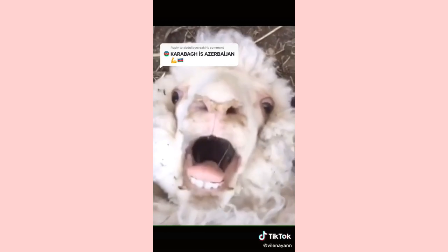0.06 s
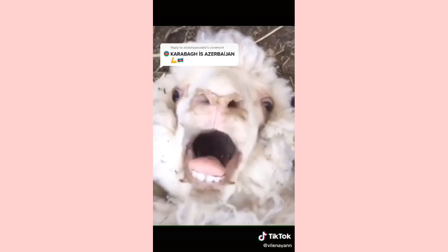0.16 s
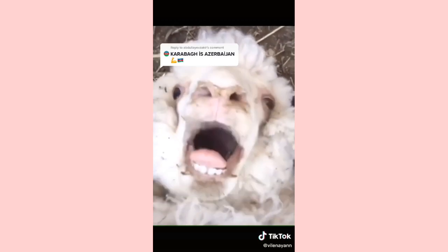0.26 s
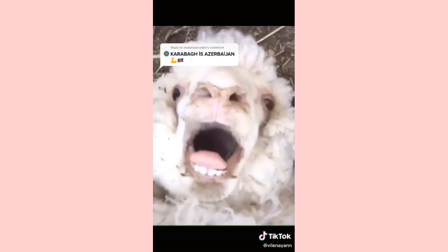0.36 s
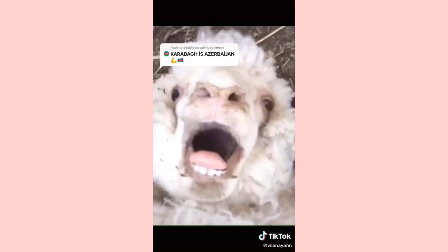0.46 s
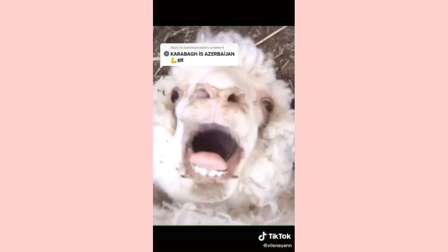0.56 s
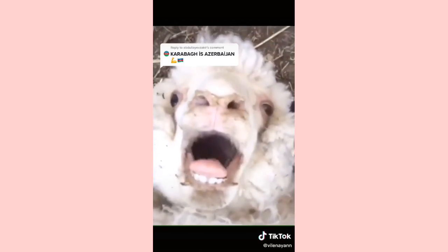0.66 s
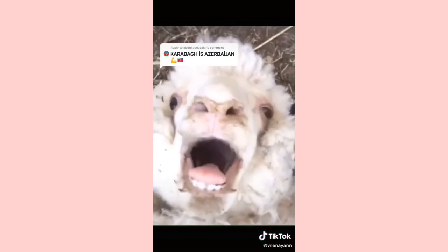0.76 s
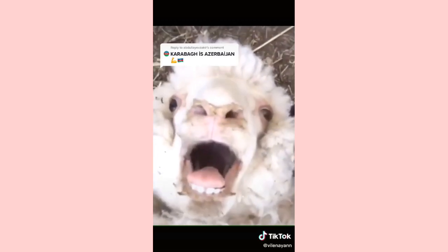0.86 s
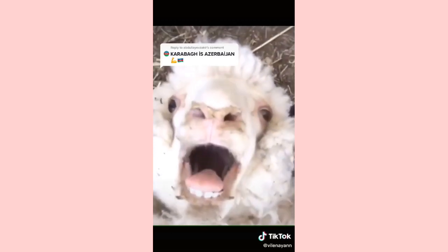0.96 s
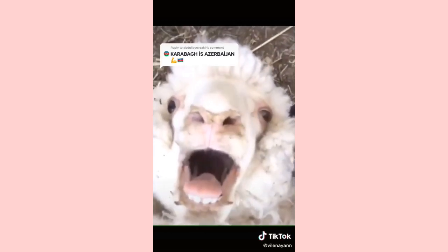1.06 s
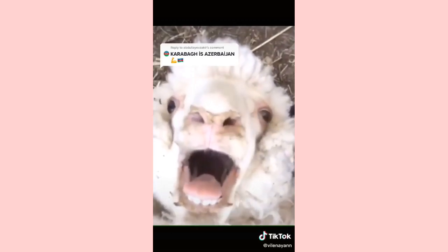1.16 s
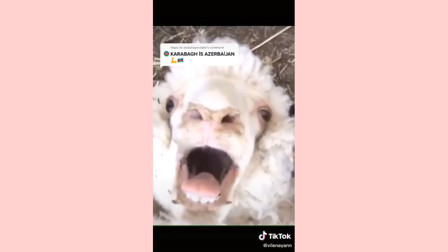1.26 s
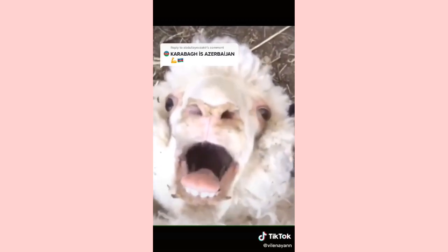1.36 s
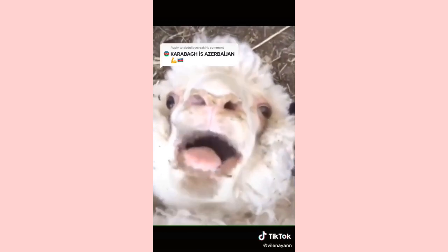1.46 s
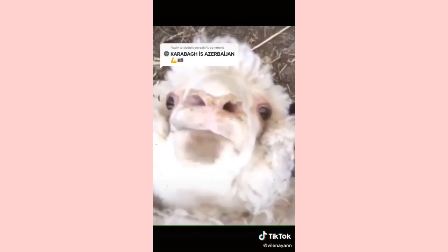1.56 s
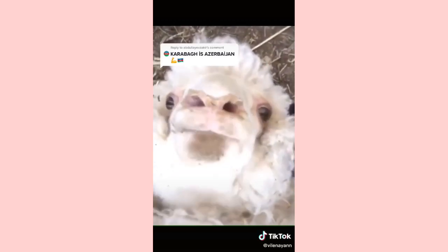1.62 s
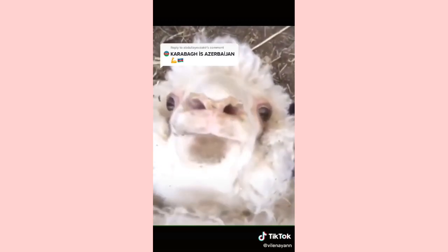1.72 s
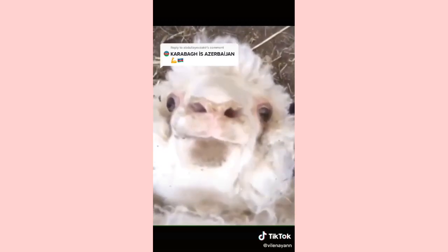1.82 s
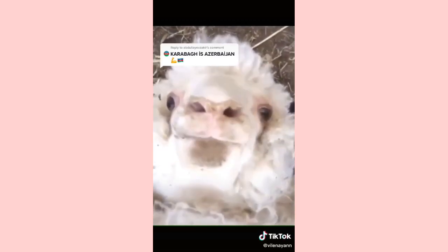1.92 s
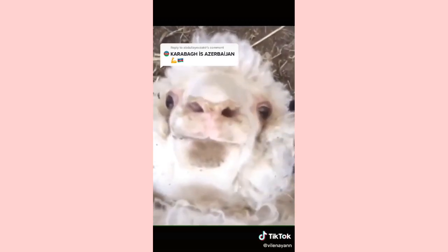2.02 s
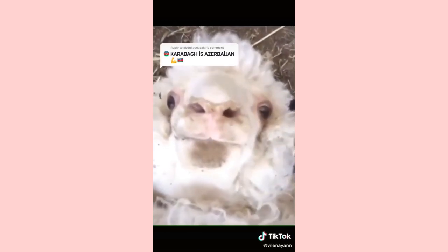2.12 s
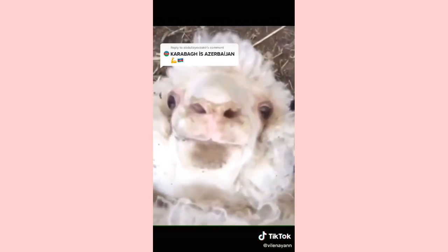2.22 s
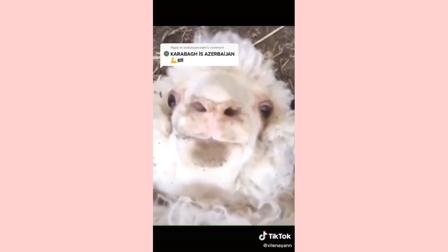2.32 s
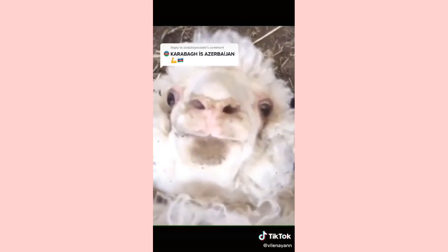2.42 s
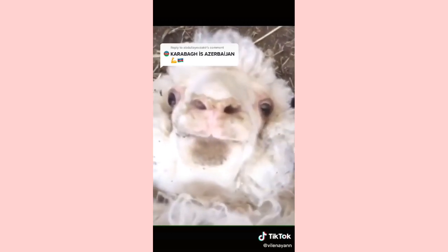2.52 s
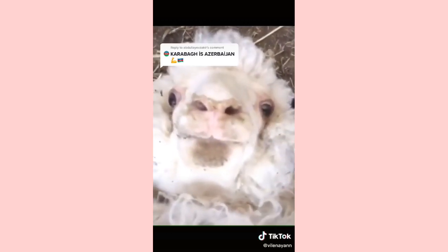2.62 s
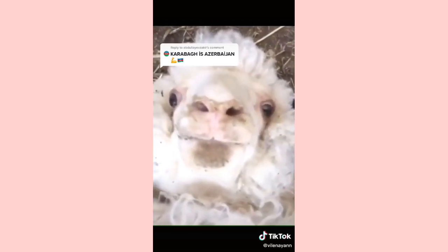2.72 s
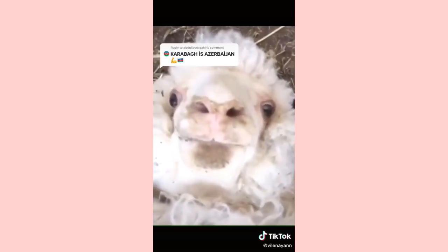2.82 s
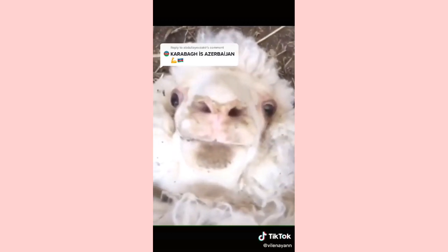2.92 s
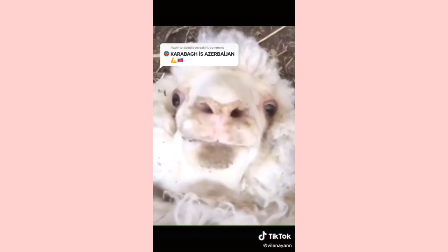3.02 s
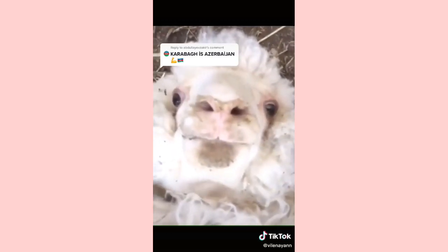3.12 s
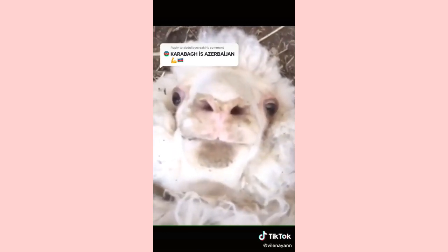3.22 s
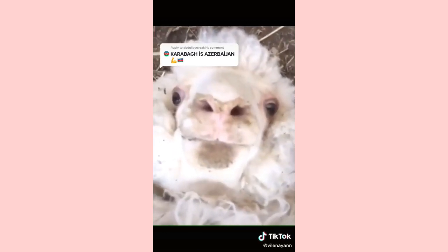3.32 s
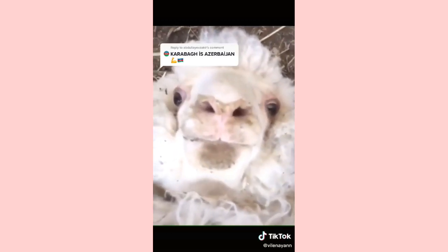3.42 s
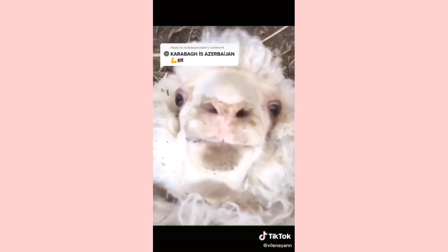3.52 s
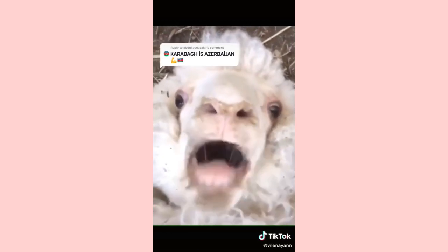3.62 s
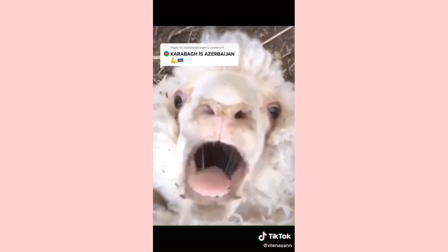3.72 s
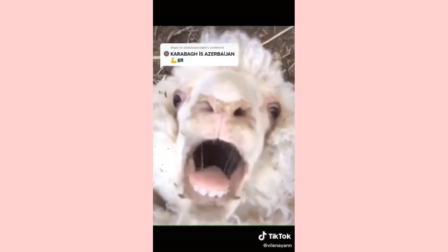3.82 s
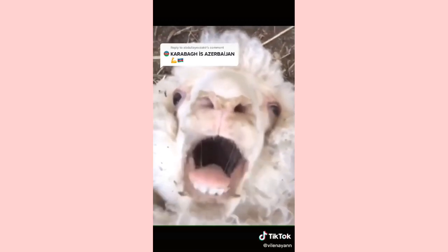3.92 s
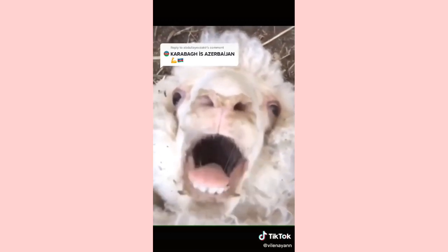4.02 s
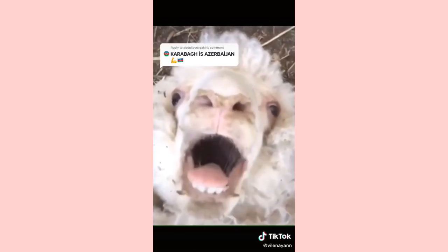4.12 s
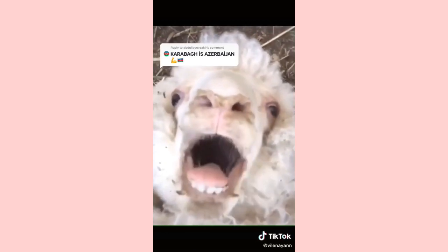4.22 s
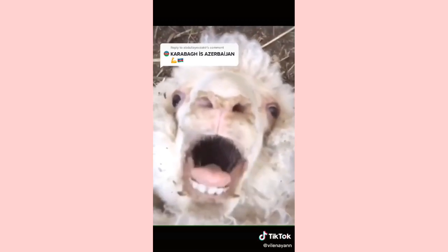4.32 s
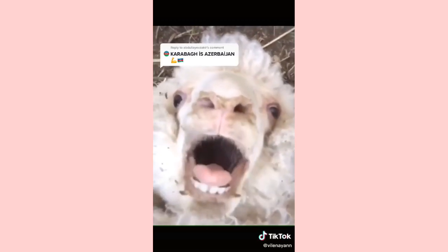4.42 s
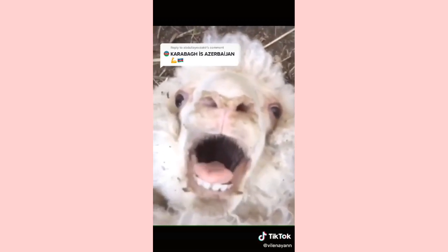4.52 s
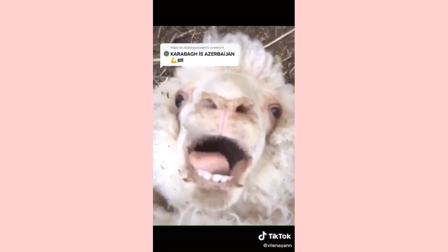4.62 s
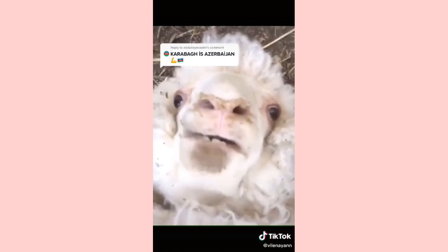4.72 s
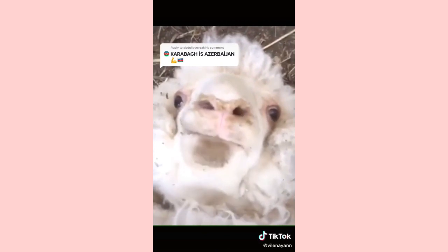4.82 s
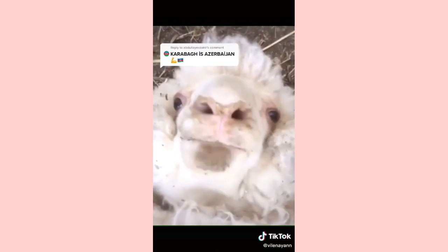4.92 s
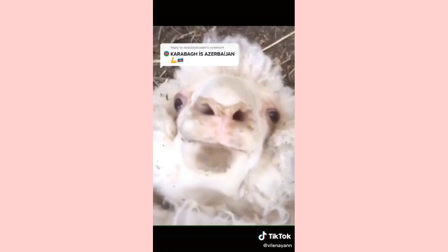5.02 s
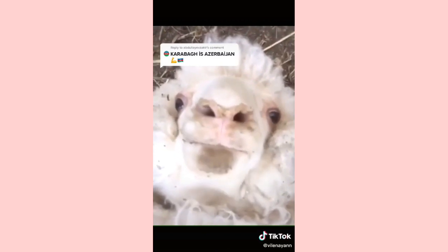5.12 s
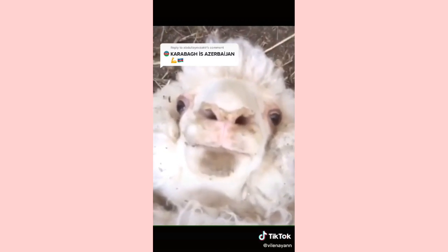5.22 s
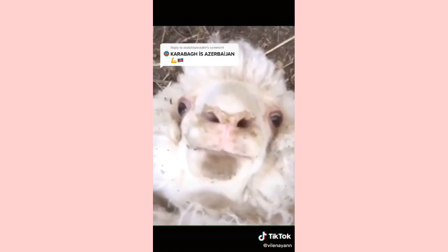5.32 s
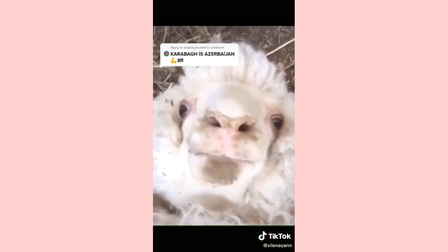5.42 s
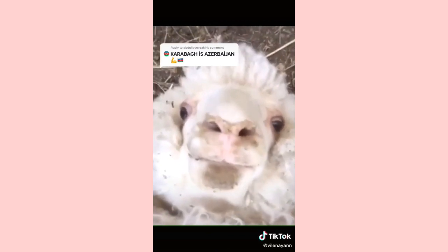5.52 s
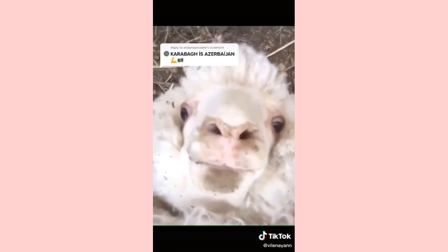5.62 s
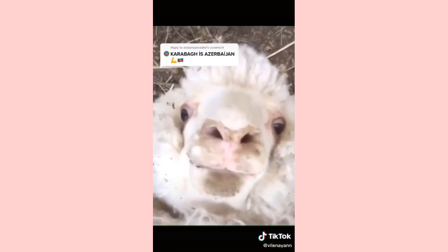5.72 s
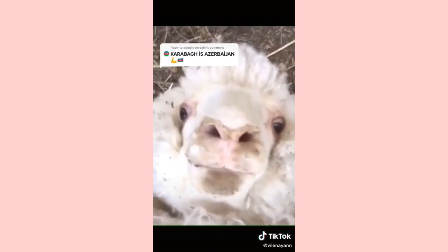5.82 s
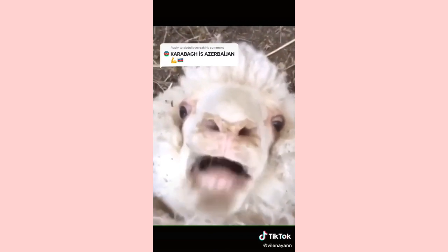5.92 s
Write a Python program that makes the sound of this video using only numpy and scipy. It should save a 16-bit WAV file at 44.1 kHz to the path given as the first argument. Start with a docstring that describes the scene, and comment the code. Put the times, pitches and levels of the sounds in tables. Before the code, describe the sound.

Two long, loud baas from a close sheep in a quiet outdoor pen, with faint sniffing and a third bleat just beginning.

```python
"""A quiet, almost dry outdoor pen, a sheep bleating wide-mouthed up close: two long baas, then the start
of a third. The first opens rough; the others begin as a rasp of irregular flaps of the vocal folds.
Once the folds lock, their pulses buzz through the resonances of throat and mouth as a steady note.
In between, the sheep shuts its mouth, snorts, sniffs and smacks faintly."""
import sys
import numpy as np
from scipy import signal
from scipy.fft import rfft, irfft
from scipy.io import wavfile
from scipy.ndimage import uniform_filter1d

SR = 44100
rng = np.random.default_rng(int(sys.argv[2]) if len(sys.argv) > 2 else 0)


def wrap_up_sound(samples):
    """Save the sound to the file named by the first command line argument, as 16-bit audio."""
    columns = np.atleast_2d(samples).T
    # keep every value between -1 and 1, then stretch to whole-number steps
    tamed = np.clip(columns, -1, 1)
    steps = np.round(tamed * 32767).astype(np.int16)
    wavfile.write(sys.argv[1], SR, steps)


N = 262836
TIME = np.arange(N) / SR


def from_db(db):
    """Decibels to gain."""
    return 10 ** (np.asarray(db) / 20)


def rms_one(x):
    """Scale to rms 1."""
    return x / np.sqrt(np.mean(x ** 2) + 1e-20)


def even(x, window_s=.04):
    """Hold the running rms at 1."""
    return x / np.sqrt(np.abs(uniform_filter1d(x * x, int(window_s * SR))) + 1e-14)


def curve(points):
    """Join (time, value) breakpoints, one value a sample."""
    return np.interp(TIME, *np.transpose(points))


def gate(start, end):
    """1 from start to end, with soft edges."""
    return uniform_filter1d(1. * ((TIME >= start) & (TIME <= end)), size=300)


def bell(offset_s, width_s):
    """1 at no offset, falling away smoothly to both sides."""
    return np.exp(-(offset_s / width_s) ** 2)


def cut(x, hz, kind, order):
    """Butterworth filter."""
    return signal.sosfilt(signal.butter(order, hz, kind, fs=SR, output="sos"), x + 1e-18)


def sliding_resonance(x, hz, width_hz):
    """A resonance of gain 1 whose centre follows hz."""
    turn, radius = np.exp(2j * np.pi * np.cumsum(hz) / SR), np.exp(-np.pi * width_hz / SR)
    return 2 * np.real(turn * signal.lfilter([1 - radius], [1, -radius], x / turn))


def coloured_noise(spectrum):
    """Noise of rms 1 with the given spectral shape."""
    hz, db = np.transpose(spectrum)
    bins = np.maximum(np.fft.rfftfreq(N, 1 / SR), 1)
    gain = from_db(np.interp(np.log(bins), np.log(hz), db))
    return rms_one(irfft(rfft(rng.standard_normal(N)) * gain, N))


def pulses(times, sizes):
    """A click at each time, shared between its two nearest samples."""
    at, out = np.clip(np.asarray(times) * SR, 0, N - 2), np.zeros(N)
    np.add.at(out, at.astype(int), sizes * (1 - at % 1))
    np.add.at(out, at.astype(int) + 1, sizes * (at % 1))
    return out


def outdoor_bed():
    """Steady open-air ambience: a low rumble under a thin hiss."""
    # spectral shape of the ambience: f/Hz, level/dB
    spectrum = [(15, -35.5), (28, -16), (48, -1), (110, -5), (190, -10), (320, -16.5), (700, -19),
                (1500, -17.5), (2400, -26.5), (3000, -16), (3700, -30), (6000, -31.5), (10000, -41.5),
                (13000, -40), (15500, -38.5)]
    return coloured_noise(spectrum)


def pen_echo(x, t60=0.28, dull_hz=4500, first_echo_s=0.004):
    """A short, dull tail scattered from the ground and things around."""
    age = TIME[:SR]
    tail = cut(rng.standard_normal(SR), dull_hz, "low", order=1)
    tail *= from_db(-60 * age / t60) * (age > first_echo_s)
    return signal.fftconvolve(x, tail / np.linalg.norm(tail))[:N]


def smacks():
    """Soft smacks and gulps: each is a small noise burst ringing one cavity of the shut mouth."""
    # bursts, ahead of the low-pass: t/s, peak/dB, f/Hz, width/Hz, length/s
    bursts = [(1.946, -50, 1260, 120, .02), (2.627, -54, 866, 120, 0.019), (3.025, -54, 3053, 702, 0.017),
              (3.295, -48, 1900, 1100, 0.0067), (3.297, -51.5, 570, 200, .015),
              (3.376, -55, 408, 60.6, 0.017), (3.468, -49.5, 1810, 990, 0.006),
              (4.824, -58, 201.5, 158, 0.01035), (5.446, -48, 2270, 700, 0.026)]
    out = np.zeros(N)
    for start, peak_db, hz, width, length in bursts:
        age = np.maximum(TIME - start, 0) / length
        burst = age * np.exp(-2 * age) * rng.standard_normal(N) + 1e-18
        radius = np.exp(-np.pi * width / SR)
        cavity = [1, -2 * radius * np.cos(2 * np.pi * hz / SR), radius ** 2]
        ring = signal.lfilter([1, 0, -1], cavity, burst)
        out += from_db(peak_db) * ring / np.abs(ring).max()
    return cut(out, 4500, "low", order=4)


def draughts(rows, attack_s=.016, fade_db_per_s=327):
    """Envelope of a run of breaths: each swells, holds and dies away."""
    power = 0
    for start, length, db in rows:
        swell = np.clip((TIME - start) / attack_s, 0, 1)
        fade_db = fade_db_per_s * np.clip(TIME - start - length, 0, 1)
        power += (swell * from_db(db - fade_db)) ** 2
    return np.sqrt(power)


def airway(x, resonances, low_hz=130, soft_hz=6300, top_hz=10800):
    """Softened sound passes each resonance in turn, then lingers in the side cavities of the head."""
    # side cavities: f/Hz, width/Hz
    cavities = [(1000, 600), (1850, 850), (2200, 1300), (2550, 350)]
    x = cut(x, low_hz, "high", order=1)
    x = cut(x, soft_hz, "low", order=4)
    x = cut(x, top_hz, "low", order=6)
    for hz, width, db in resonances:
        pole, turn = np.pi * width / SR, -2 * np.cos(2 * np.pi * hz / SR)
        zero = pole * from_db(db)
        x = signal.lfilter([1 + zero, turn, 1 - zero], [1 + pole, turn, 1 - pole], x)
    for hz, width in cavities:
        pole, turn = np.pi * width / SR, -2 * np.cos(2 * np.pi * hz / SR)
        x = signal.lfilter([1 - pole, turn, 1 + pole], [1 + pole, turn, 1 - pole], x)  # all-pass smear
    return x


def nostrils(snort_db=-0.7, sniff_db=-0.3):
    """One snort rings the nose after the first baa; small uneven sniffs follow both baas."""
    # resonances of the nose: f/Hz, width/Hz, gain/dB
    nose = [(1250, 120, 25), (2230, 280, 10.5), (3150, 140, 16), (3900, 80, 6), (5000, 330, 8.5)]
    # pushes of the snort: t/s, length/s, level/dB
    pushes = [(1.728, 0.066, -54), (1.83, .095, -60), (1.93, .04, -56.5), (2.03, .13, -63)]
    # sniffs: t/s, length/s, level/dB
    sniffs = [(2.365, .05, -69), (2.84, .17, -64.5), (3.015, 0.025, -56.5), (3.185, 0.064, -57),
              (3.355, .025, -66), (4.975, .17, -69.5), (5.145, .03, -59), (5.247, .035, -59),
              (5.342, 0.029, -60.5), (5.44, .035, -57.5), (5.55, .35, -65.5)]
    # spectral shape of the sniffs: f/Hz, level/dB
    sniff_colour = [(300, -33), (600, -6), (1030, -22), (1300, -4), (1820, 2.5), (2100, -8), (2280, -1.5),
                    (2490, -11.5), (2950, 7.5), (3700, -20), (4200, -8.5), (5600, -19.5), (7800, -31.5),
                    (11000, -49)]
    nasal = rms_one(airway(rng.standard_normal(N), nose, low_hz=1400, soft_hz=5470))
    snort = from_db(snort_db) * draughts(pushes) * nasal
    return snort + from_db(sniff_db) * draughts(sniffs) * coloured_noise(sniff_colour)


def puffs(closures, length_s):
    """Each closure of the folds lets out a short puff of turbulence, as strong as the closure itself."""
    fade = np.exp(-1 / (length_s * SR))
    flow = signal.lfilter([np.sqrt(1 - fade ** 2)], [1, -fade], closures + 1e-18)
    return flow * rng.standard_normal(N)


def scatter(x, t60=.02, from_hz=4700, amount_db=-0.5):
    """The short waves of the treble bounce about between teeth and palate."""
    age = TIME[:2000]
    bounces = rng.standard_normal(len(age)) * from_db(-60 * age / t60)
    treble = cut(x, from_hz, "high", order=4)
    return x + from_db(amount_db) * signal.fftconvolve(treble, bounces / np.linalg.norm(bounces))[:N]


def mouth(voice, level_db, first_db, upper_db, edge_db, sheen_db=-15.5, sheen_slope=2.1):
    """Jaw and tongue weight the bands against the second formant; a hard push brings out the sheen."""
    out = 0
    for top_hz, weight_db in [(1500, first_db), (2150, 0), (3700, upper_db), (6900, edge_db)]:
        band = signal.sosfiltfilt(signal.butter(10, top_hz, fs=SR, output="sos"), voice)
        out += even(band) * from_db(weight_db)
        voice = voice - band
    push_db = np.clip(level_db + 20, -1.5, 4)
    sheen = even(voice) * from_db(edge_db + sheen_db + sheen_slope * push_db)
    return (out + sheen) * from_db(level_db)


def opening_mouth(voice, start, end, first_db, speed):
    """The mouth opens on a rasp: the formants swell while the treble edge sinks and recedes."""
    # sinking resonance: start f/Hz, wide-open f/Hz, time constant/s, width/Hz, gain/dB
    sinking = (7000, 4000, .085, 410, 8)
    # second, first, upper formants and treble edge: start level/dB, wide-open level/dB, time constant/s
    opening = [(-36.5, -18, .055), (-43, -25.5, 0.018), (-33, -18, .028), (-31, -40, .16)]
    age = speed * np.maximum(TIME - start, 0)
    shut_hz, wide_hz, sink_s, width_hz, ring_db = sinking
    ring_hz = wide_hz + (shut_hz - wide_hz) * np.exp(-age / sink_s)
    voice = voice + from_db(ring_db) * sliding_resonance(voice, ring_hz, width_hz)
    second, first, upper, edge = [wide + (shut - wide) * np.exp(-age / pace_s)
                                  for shut, wide, pace_s in opening]
    voice = mouth(voice, second, first + first_db - second, upper - second, edge - second)
    return voice * gate(start, end)


def rasp(flap_hz=180, jitter_s=.0009, shimmer_db=-0.5, air_db=-6, rattle_db=-3.0):
    """Before they lock, the folds flap unevenly in a strong flow; a few flaps stand out."""
    # peaks and dips of the rasping throat: f/Hz, width/Hz, gain/dB
    throat = [(932, 210, 28.5), (1760, 320, 16), (2230, 180, 13.5), (2708, 73, 8.5), (2978, 270, 21.5),
              (3800, 310, -10), (4800, 1600, 13), (7200, 510, -3.5), (7740, 230, 16.5)]
    # rasping onsets: start/s, end/s, first-formant trim/dB, jaw speed/multiple of the usual
    onsets = [(3.608, 3.621, 0, 2.5), (3.626, 3.897, 0, 1), (5.938, 5.98, -9, 6)]
    # hardest flaps of the folds: t/s, level/dB
    hard_flaps = [(3.594, -42), (3.6134, -11.5), (3.6275, -16), (3.6555, -9.5), (3.67, -8), (3.694, -8),
                  (3.707, -11), (3.732, -3.5), (3.7724, -8.5), (3.788, -6), (3.8452, -8.5), (5.919, -28),
                  (5.939, -16), (5.953, -7.5)]
    late, strong = rng.standard_normal((1400, 2)).T
    closures = pulses(np.arange(len(late)) / flap_hz + jitter_s * late, from_db(shimmer_db * strong))
    air = from_db(air_db) * puffs(closures, length_s=0.0061)
    rattle = scatter(airway(closures + air, throat))
    rattle = sum(opening_mouth(rattle, *onset) for onset in onsets)
    times, flap_db = np.transpose(hard_flaps)
    flaps = airway(pulses(times, from_db(flap_db)), throat, low_hz=1120, soft_hz=5500)
    return rattle * from_db(rattle_db) + flaps * from_db(flap_db.max()) / np.abs(flaps).max()


def sway(x, path_s=0.002695, swing_s=.00008, echo_db=-15):
    """The head trembles, so a close reflection shifts and single overtones swell and fade."""
    tremble = rms_one(irfft(rfft(rng.standard_normal(N))[:24], N))  # below 4 Hz
    return x + from_db(echo_db) * np.interp(TIME - path_s - swing_s * tremble, TIME, x)


def closing_jaw(voice, release):
    """Towards the release the closing jaw brings out a resonance among the upper formants."""
    # jaw resonance: f/Hz, width/Hz, gain/dB, swell time/s
    jaw_ring = (2800, 220, 0, .14)
    hz, width_hz, db, swell_s = jaw_ring
    ring = sliding_resonance(voice, np.full(N, hz), width_hz)
    return voice + from_db(db) * bell(TIME - release, swell_s) * ring


def roughness(start, release, at_start, at_release, floor=.06, lock_s=.06, break_s=.033):
    """Unsteadiness of the folds, 0-1: raised until they lock, in hoarse spells and as they break up."""
    # hoarse spells in mid-note: t/s, half length/s, added roughness
    spells = [(.29, .12, .34), (.91, .05, .1)]
    locking = at_start * bell(TIME - start, lock_s)
    hoarse = sum(amount * bell(TIME - centre, half_length) for centre, half_length, amount in spells)
    breaking = at_release * np.exp(np.minimum(TIME - release, break_s) / break_s)
    return np.clip(floor + locking + hoarse + breaking, 0, 1)


def baa(shape, pitch_curve, effort_curve, throat, jitter_s, shimmer_db, air_db, rough_air_db, hiss_db):
    """The locked folds pulse once a cycle; roughness shakes timing and size and adds turbulence."""
    usual_effort_db, spared_share, release_db_per_s = -21.5, 0.81, 950
    rough_lift_db, closing_edge_db, closing_s = 5.0, -6, .05
    start, release, rough_start, rough_end, second_db, first_db, upper_db, edge_db = shape
    effort_db = curve(effort_curve)
    rough = roughness(start, release, rough_start, rough_end)
    cycles = np.cumsum(curve(pitch_curve)) / SR
    times = np.interp(np.arange(int(cycles[-1])), cycles, TIME)
    late, strong = rng.standard_normal((1400, 2))[:len(times)].T * np.interp(times, TIME, rough)
    closures = pulses(times + jitter_s * late, from_db(shimmer_db * strong))
    air = cut(puffs(closures, length_s=.006), 1700, "high", order=2)
    air *= from_db(air_db) + rough * from_db(rough_air_db)
    # the steady stream hisses over tongue and teeth
    hiss = cut(rng.standard_normal(N), [5300, 7000], "band", order=3) * closures.std() * from_db(hiss_db)
    voice = scatter(airway(closures + air + hiss, throat))
    voice = closing_jaw(sway(voice), release)
    # below the usual effort the second formant gives way first; the rest are spared most of its loss
    spared_db = spared_share * np.maximum(usual_effort_db - effort_db, 0)
    first_db += spared_db
    upper_db += spared_db + rough_lift_db * rough
    edge_db += spared_db + closing_edge_db * bell(np.minimum(TIME - release, 0), closing_s)
    voice = mouth(voice, effort_db + second_db, first_db, upper_db, edge_db)
    fade = from_db(-release_db_per_s * np.clip(TIME - release, 0, .5))
    return voice * gate(start, TIME[-1]) * fade


def bleats():
    """Two held baas, each sagging in pitch and effort at its end."""
    # note shape: start/s, release/s, roughness added at start and at release, second formant/dB re effort,
    # then first formant/dB, upper formants/dB, treble edge/dB re the second formant
    first_shape = (0.0, 1.491, 1.2, .75, -.5, -11.2, -4.6, -22.9)
    second_shape = (3.89, 4.612, .16, .2, -.7, -12, -0.8, -21)
    # pitch of the folds: t/s, f/Hz
    first_pitch = [(0.0, 193.5), (0.024, 194), (0.04, 190.6), (0.376, 187.6), (0.902, 178.7),
                   (1.164, 185.7), (1.316, 185), (1.428, 177.6), (1.474, 168.1), (1.5, 155.4)]
    second_pitch = [(3.905, 175.6), (4.095, 178.7), (4.329, 175.6), (4.453, 172.3), (4.575, 163.6),
                    (4.62, 159.2)]
    # vocal effort: t/s, level/dB
    first_effort = [(0.0, -14.5), (0.02, -25), (0.036, -16.5), (0.05, -22), (0.066, -17), (0.162, -15),
                    (0.316, -18.5), (0.45, -18), (0.696, -21), (1.168, -20.5), (1.47, -21), (1.5, -40.5)]
    second_effort = [(3.89, -19), (3.946, -16), (4.246, -17), (4.276, -19), (4.508, -22), (4.586, -27.5),
                     (4.615, -34.5)]
    # peaks and dips of throat and mouth: f/Hz, width/Hz, gain/dB
    first_throat = [(402, 300, 0), (757, 120, -6.5), (896.4, 63, 37), (1298, 80, 8.5), (1524, 68, -2.5),
                    (1856.5, 65, 24), (1965, 70, 6.5), (2308, 130, 14), (2528, 50, 7.5), (2736, 73, 10.5),
                    (3045, 220, 18.5), (3690, 710, -11), (4677, 680, 13.5), (6870, 530, -4.5),
                    (7740, 270, 9.5), (9500, 100, 12)]
    second_throat = [(498.6, 67, 8.5), (749, 120, -13.5), (917, 90, 17.5), (1904, 160, 34), (2013, 62, -20),
                     (2460, 200, 6), (2689, 33, 13), (2830, 52, -1.5), (3080, 230, 28), (3620, 1300, -13.5),
                     (4510, 530, 2), (6900, 1000, -9), (7850, 120, 14.5), (9600, 200, 8.5)]
    first = baa(first_shape, first_pitch, first_effort, first_throat,
                jitter_s=0.000097, shimmer_db=1, air_db=-29, rough_air_db=1.5, hiss_db=-3)
    second = baa(second_shape, second_pitch, second_effort, second_throat,
                 jitter_s=0.00013, shimmer_db=6.5, air_db=-29, rough_air_db=3.5, hiss_db=-5.5)
    return first + second


def scene(echo_db=-30, bed_db=-67.5):
    """The sheep up front in mono, with a faint echo over the outdoor bed."""
    sheep = bleats() + rasp() + nostrils() + smacks()
    return (sheep + from_db(echo_db) * pen_echo(sheep) + from_db(bed_db) * outdoor_bed())[None]


def record(dry, cutoff_hz=15500):
    """A steep low-pass takes off the very top."""
    return cut(dry, cutoff_hz, "low", order=16)


dry = scene()
out = record(dry)
wrap_up_sound(out)
```